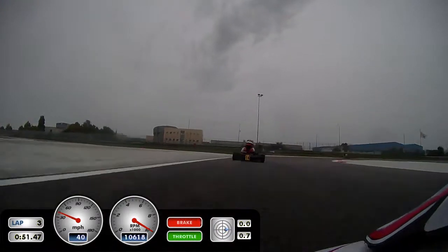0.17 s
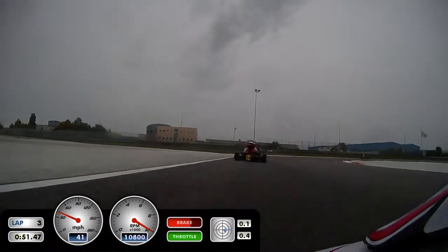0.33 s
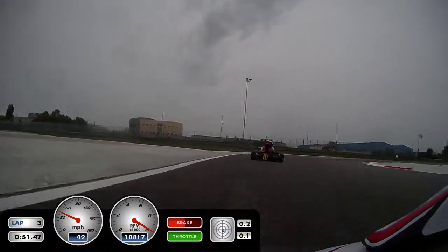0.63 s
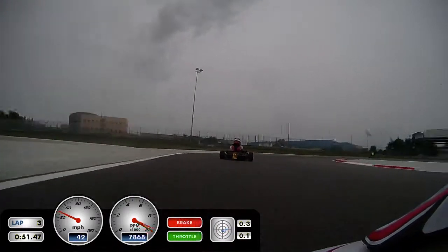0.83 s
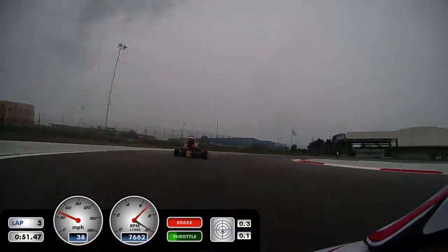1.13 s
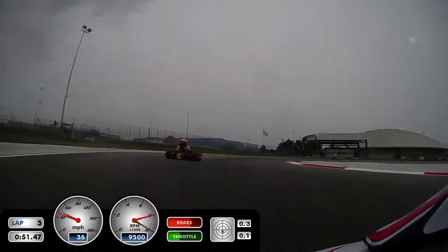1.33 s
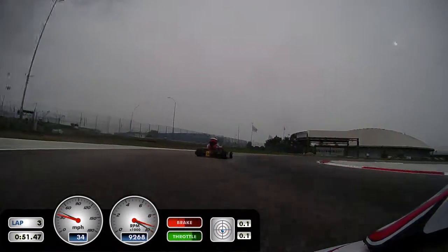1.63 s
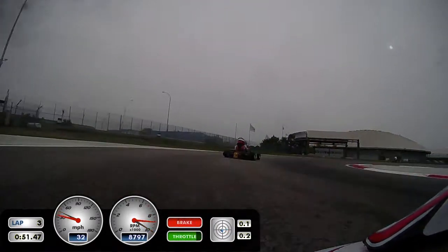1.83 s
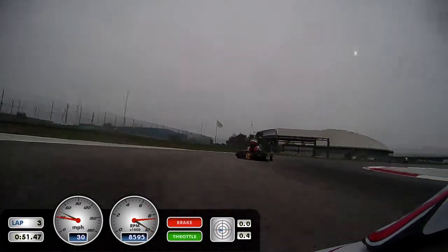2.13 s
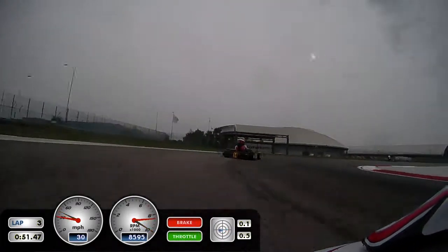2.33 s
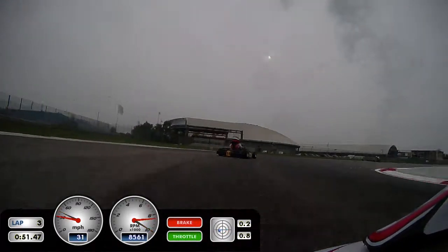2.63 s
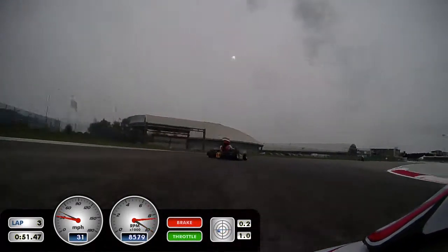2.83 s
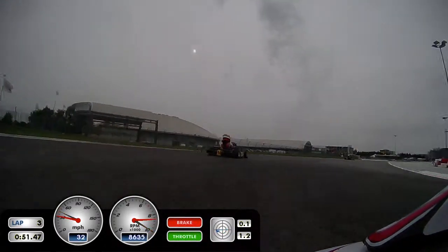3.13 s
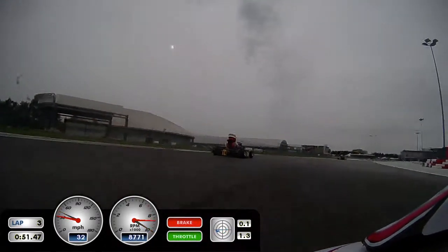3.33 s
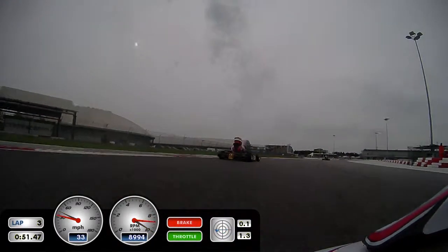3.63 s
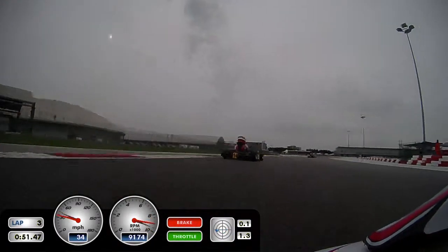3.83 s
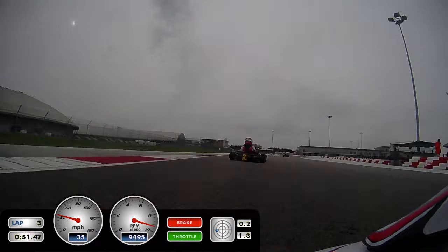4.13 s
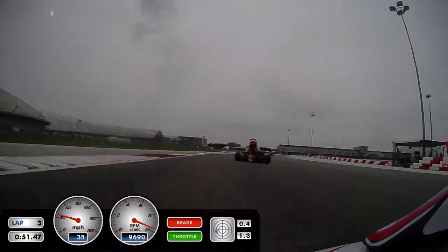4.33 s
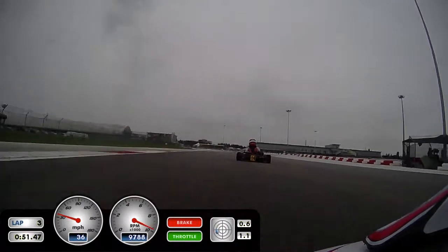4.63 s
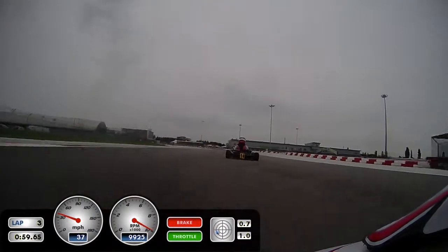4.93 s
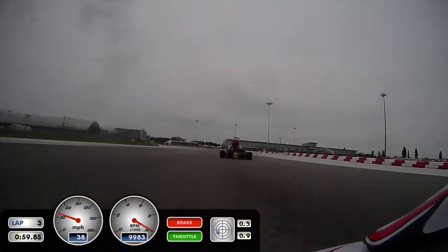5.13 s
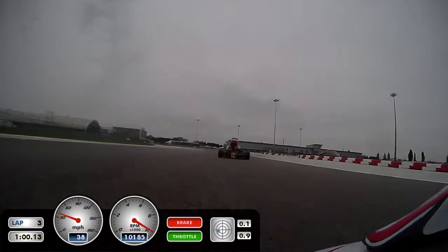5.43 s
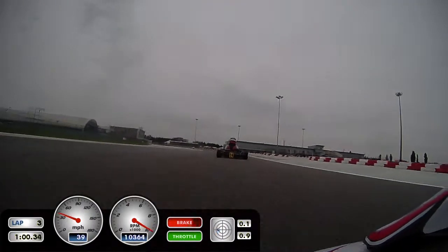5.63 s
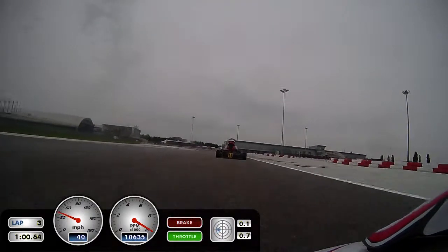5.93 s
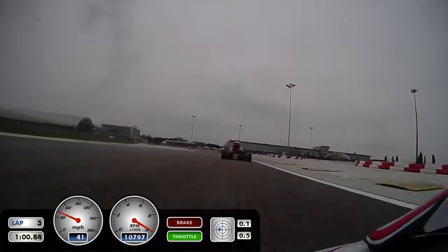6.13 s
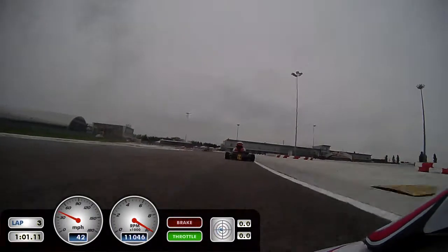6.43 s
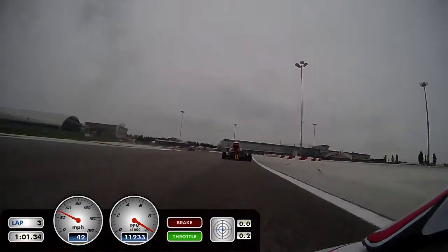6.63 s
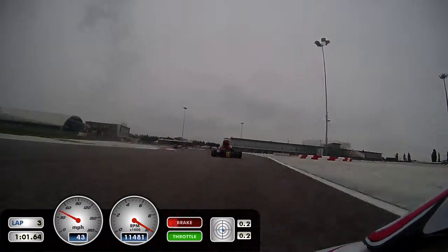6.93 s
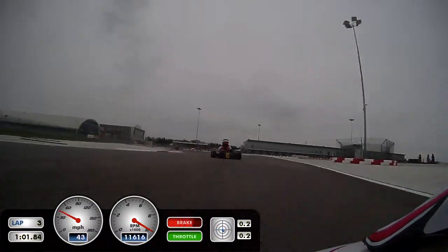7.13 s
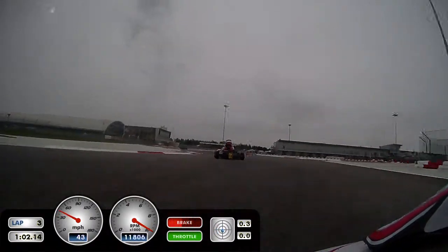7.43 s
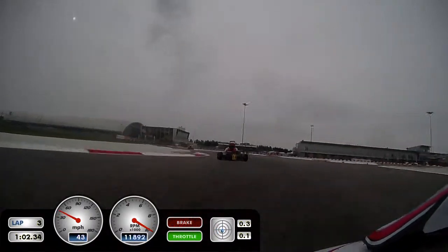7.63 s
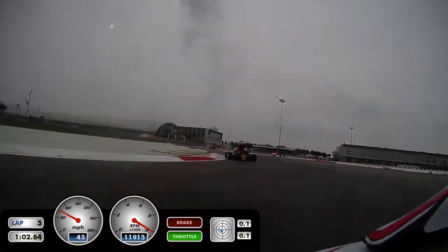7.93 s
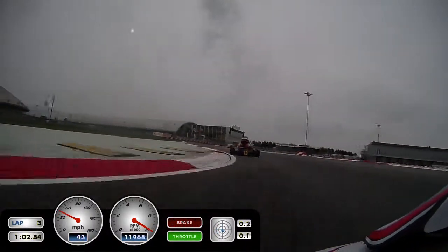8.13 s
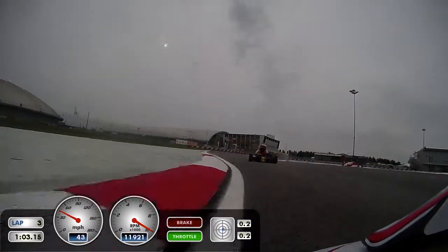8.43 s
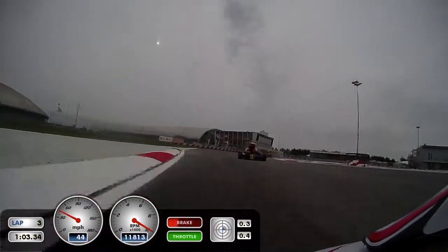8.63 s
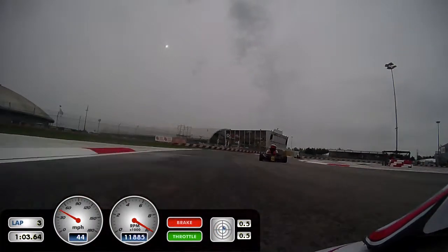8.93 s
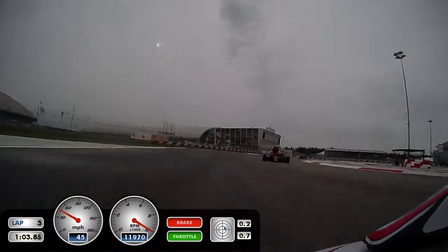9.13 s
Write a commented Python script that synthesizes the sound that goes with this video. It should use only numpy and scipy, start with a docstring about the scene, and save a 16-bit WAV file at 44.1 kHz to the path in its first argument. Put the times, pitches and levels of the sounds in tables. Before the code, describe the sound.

A two-stroke racing kart is heard from a microphone on its own frame, loud, dry and heavily overloaded. The engine starts on a high, hard drone, rising slightly until 0.5 s, then its revs plunge to a low, sputtering growl around 0.85 s, with a short unsteady tyre chirp and bumps. By 1.1 s it has leapt back up; it sags a little and holds a steady, rough buzz from about 2 to 3 s while the wind eases. From there the pitch climbs gradually, exhaust overtones singing through from about 3.6 to 5.5 s. A nasal metallic whine from the housing and a bright mount rattle follow the engine, growing coarser after 6.5 s. Wind blasts thump around 5.2, 5.5 and 6.9 to 7.6 s. Kerb hits chatter at about 8.3 to 8.4 s; the revs dip slightly, then rise again, still screaming at the end.

```python
"""Racing kart, heard from its own frame

A two-stroke racing kart heard from a camera on its frame: it brakes for a corner, then pulls up to full speed.
Engine boom and the tones of exhaust and bodywork are sine waves tied to the crank; each firing also rings the
housing and mount. Shaped noise makes the wind, the tyre roar and the kerb hits; an unsteady sine makes the tyre
chirp. It all overloads the microphone: the boom is squared off and chops everything else in its own rhythm."""
import sys
import numpy as np
from scipy import signal
from scipy.fft import rfft, irfft
from scipy.io import wavfile
from scipy.ndimage import uniform_filter1d

SR = 44100
rng = np.random.default_rng(int(sys.argv[2]) if len(sys.argv) > 2 else 0)


def master(y):
    """Save y as 16-bit WAV."""
    cut = np.clip(np.atleast_2d(y).T, -1, 1)
    pcm = np.round(cut * 32767)  # scale
    wavfile.write(sys.argv[1], SR, pcm.astype(np.int16))


N = 409248
TIME = np.arange(N) / SR

# Crank speed; the engine fires once a turn: start_s, turns_per_second_hz
CRANK_SPEED = [(0, 177.8), (.48, 182.8), (.58, 164.5), (.7, 126.7), (.78, 91.4), (.85, 76.1), (1, 136.1),
               (1.13, 156.4), (1.4, 160), (1.6, 148), (1.9, 142.7), (2.65, 142), (3.1, 145.9),
               (3.63, 151.5), (3.74, 155), (4.12, 161.3), (4.42, 162.7), (5.2, 167.9), (5.77, 177.2),
               (6.43, 185.7), (7.2, 196.6), (8.05, 199.6), (8.62, 195.5), (9.28, 203.1)]
# How unevenly the firings shake the frame: start_s, roughness (0 to 1)
ROUGHNESS = [(0, .42), (.5, .26), (.7, .6), (1.7, .4), (3.2, .32), (4.2, .16), (5.2, .17), (6.25, .26),
             (6.55, .64), (9.28, .7)]


def crank(flutter=.016, flutter_hz=20):
    """Counts the turns of the crank by adding up its speed, which flutters more when the ride is rough."""
    speed_hz, = curves(CRANK_SPEED)
    rough, = curves(ROUGHNESS)
    fluttering_hz = speed_hz * (1 + flutter * rough * wander(flutter_hz))
    return np.cumsum(fluttering_hz) / SR


# Strength of the boom's two tones at each crank speed, before the overall level:
# crank_speed_hz, first_order_db, second_order_db
PIPE_STRENGTH = [(78, -8, -13.5), (132, -8.5, -19.5), (143.3, -0.73, -21.5), (161.6, -0.85, -20.5),
                 (164.5, 1, -30), (185.1, -1.5, -16), (190.7, -6.5, -10), (200.5, -8, -10.5)]


def boom(turns, uneven=0.055, uneven_hz=50, second_lag=0.086, level_db=-0.98):
    """Intake and exhaust pressure: one wave per turn (first order) and one twice as fast (second order)."""
    first_db, second_db = by_speed(PIPE_STRENGTH)
    angle = 2 * np.pi * turns
    first = from_db(first_db) * np.sin(angle)
    second = from_db(second_db) * np.sin(2 * (angle - 2 * np.pi * second_lag))  # lag in turns
    return from_db(level_db) * (first + second) * (1 + uneven * wander(uneven_hz))


# Engine orders that sing out as the revs pass resonances of the exhaust pipe and the bodywork: # start_s,
# end_s, order (waves per turn), peak_db (before the waver)
ORDER_TONES = [(1.5, 5.4, 4, -32.5), (1.85, 2.697, 7, -31), (3.613, 5.501, 5, -27.5),
               (3.618, 5.4, 7, -37), (3.624, 4.65, 10, -22.5), (5.86, 6.85, 4, -31),
               (6.26, 6.949, 5, -24.5), (6.696, 8.595, 3, -28), (6.9, 9.4, 8, -26),
               (8.747, 9.4, 5, -27.5)]


def drones(turns, fade_s=0.1, waver=0.25, waver_hz=14):
    """Clean upper engine orders from exhaust and bodywork: sine waves at whole multiples of the crank speed."""
    tones = 0
    for start, end, order, peak_db in ORDER_TONES:
        tone = np.sin(2 * np.pi * round(order) * turns)
        tones = tones + from_db(peak_db) * gate(start, end, fade_s) * tone
    return tones * (1 + waver * wander(waver_hz))


def shaking(turns, rough, uneven_db=3, burst_s=0.0049, between=0.74, settle=0.72):
    """Each firing knocks the frame and starts a dying burst of noise; at low revs it is calmer in between."""
    speed_hz, = curves(CRANK_SPEED)
    firing = np.floor(turns - turns[0] // 1).astype(int)  # number of the current firing
    strength = from_db(uneven_db * rng.standard_normal(N))[firing]
    knocks = strength * (np.diff(firing, prepend=0) > 0)  # one click where the number goes up
    since_firing_s = (turns % 1) / speed_hz
    unrest = between * (speed_hz / speed_hz.max()) ** settle
    chatter = (unrest + strength * np.exp(-since_firing_s / burst_s)) * rng.standard_normal(N)
    rough = np.clip(rough, 0, 1)
    return (1 - rough) * unit(knocks) + rough * unit(chatter)


# Resonances of the camera housing: pitch_hz, width_hz, relative_level_db
HOUSING_MODES = [(790, 180, -10), (990, 80, -13), (1500, 30, -14), (1633, 230, 2.5), (1800.6, 70, 15.5),
                 (1910, 170, -10)]
# How hard the frame shakes, before the level settings of housing and mount:
# crank_speed_hz, housing_ring_db, mount_rattle_db
FRAME_SHAKE = [(78, -35, -37.5), (127, -28, -35.5), (142, -21.5, -32.5), (160, -19, -31),
               (167.3, -17, -30.5), (177.6, -17.5, -26), (188.7, -16.5, -20.5), (197.6, -19, -22)]


def housing(turns, lag=0.048, ring_db=-3, buzz_db=-5, flicker_db=2.4, flicker_hz=32):
    """The housing sings near one pitch as engine orders sweep through it, and sputters on rough going."""
    sing_db, _ = by_speed(FRAME_SHAKE)
    rough, = curves(ROUGHNESS)
    late_turns = turns - lag
    ringing = steady(ring(shaking(late_turns, rough), HOUSING_MODES))
    sing = from_db(ring_db) * ringing + from_db(buzz_db) * buzz(late_turns)
    sputter_db = flicker_db * rough * wander(flicker_hz)
    return sing * from_db(sing_db + jolts() + sputter_db)


# A loose part of the housing locks to one engine order, then jumps to another:
# start_s, end_s, order (swings per turn)
BUZZ_ORDERS = [(-.1, .53, 10), (1.08, 1.48, 11), (1.52, 1.95, 12), (2.68, 3.66, 12), (3.68, 5.1, 11),
               (5.47, 6.3, 10), (6.4, 9.4, 9)]


def buzz(turns, slip=1.4, slip_hz=30, grip_s=0.031):
    """The locked part swings as a cosine on one order, its timing slipping on rough going."""
    rough, = curves(ROUGHNESS)
    slipping = slip * rough * wander(slip_hz)  # slip in radians
    swings = 0
    for start, end, order in BUZZ_ORDERS:
        swings = swings + gate(start, end, grip_s) * np.cos(2 * np.pi * order * turns + slipping)
    return swings


# Bumps and coarse asphalt that make housing and mount ring harder:
# centre_s, spread_s (centre to 1/e), added_db (in full for the housing, a share for the mount)
ROAD_JOLTS = [(0.82, .009, 8), (0.981, .008, 7.5), (1.185, 0.015, 2.5), (2.162, .004, 9),
              (3.552, 0.16, 2.5), (4.185, 0.12, 5), (5.835, 0.078, 4.5), (6.896, .006, 4),
              (7.09, .004, 6.5), (7.259, 0.0061, 11), (8.287, .08, 5), (8.549, .005, 7)]


def jolts():
    """Bumps in the asphalt shake the frame harder: bell-shaped rises in decibels."""
    return sum(added_db * bump(centre, spread) for centre, spread, added_db in ROAD_JOLTS)


# Resonances of the rattling mount: pitch_hz, width_hz, relative_level_db
MOUNT_MODES = [(3620, 67, 11), (4006, 180, 10.5), (4910, 190, 7), (5540, 700, -28), (6500, 510, -25.5)]


def mount(turns, lag=0.032, level_db=-3.0, rough=1.0, flicker_db=1.5, flicker_hz=35, jolt_share=0.24):
    """The shaken mount rattles high and bright; its level flickers more at low revs."""
    _, rattle_db = by_speed(FRAME_SHAKE)
    speed_hz, = curves(CRANK_SPEED)
    shakes = shaking(turns - lag, rough, uneven_db=0.0, burst_s=0.0064, between=0.52)
    highpass = signal.butter(4, 3300, "high", fs=SR)
    rattle = signal.lfilter(*highpass, ring(shakes, MOUNT_MODES))
    clatter_db = flicker_db * speed_hz.max() / speed_hz * wander(flicker_hz)
    return steady(rattle) * from_db(level_db + rattle_db + clatter_db + jolt_share * jolts())


# A wheel strikes the kerb and the whole camera chatters: centre_s, spread_s (centre to 1/e), level_db
KERB_HITS = [(8.268, .006, -10), (8.384, .011, -6)]


def kerb(rattle_share=0.11):
    """Short bursts of hard shaking: noise rings through housing and mount together."""
    shocks = rng.standard_normal(N)
    chatter = unit(ring(shocks, HOUSING_MODES)) + rattle_share * unit(ring(shocks, MOUNT_MODES))
    loudness = sum(from_db(level_db) * bump(centre, spread) for centre, spread, level_db in KERB_HITS)
    return steady(chatter, size=600) * loudness


# The braked rear tyres chirp as they nearly lock: time_s, pitch_hz (before scatter), level_db
TYRE_CHIRP = [(.77, 945, -57), (.795, 940, -28), (0.816, 924, -35), (.83, 903, -29), (.85, 823, -29),
              (.87, 820, -63)]


def chirp(scatter=0.065, scatter_hz=120):
    """Rubber sticks and slips, heard as a sine wave of unsteady pitch."""
    pitch_hz, level_db = curves(TYRE_CHIRP)
    unsteady_hz = pitch_hz * (1 + scatter * wander(scatter_hz))
    squeal = np.sqrt(2) * np.sin(2 * np.pi * np.cumsum(unsteady_hz) / SR)
    return gate(TYRE_CHIRP[0][0], TYRE_CHIRP[-1][0], .005) * from_db(level_db) * squeal


# Wind on the microphone, before the overall level: time_s, level_db
WIND_LEVEL = [(0, -9.5), (.6, -7), (.9, -8), (1.35, -5), (1.9, -11.5), (2.3, -20), (3.3, -16.5),
              (4.0, -16.5), (4.6, -10), (5.6, -13.5), (6.5, -11.5), (7.6, -5.5), (8.6, -8.5), (9.28, -7)]
# Colour of the wind noise: pitch_hz, relative_level_db (per Hz)
WIND_SPECTRUM = [(10, -7), (35, 4), (55, -1), (80, -1), (160, -10), (300, -18.5), (500, -24.5),
                 (800, -29.5), (1200, -42.5), (2500, -53.5), (7000, -59)]
# Single blasts of air, a push and then a pull: centre_s, length_s, peak_db
WIND_GUSTS = [(.707, .02, -5), (0.863, 0.016, -4), (1.344, .025, -2.5), (1.372, 0.02, -3.5),
              (4.559, 0.037, -5.5), (5.157, 0.025, 1.5), (5.537, 0.02, -0.5), (6.889, 0.018, 4),
              (7.071, .024, 1), (7.131, 0.012, 3), (7.297, 0.015, 2), (7.642, 0.0083, 0.5),
              (8.138, .018, 0.5), (8.28, 0.018, 7), (8.904, 0.017, -1.5)]


def wind(level_db=-2.5, lumpy_db=2.0, lumpy_hz=14):
    """Air tumbling over the microphone: noise of lumpy level, plus blasts of one sine cycle each."""
    wind_db, = curves(WIND_LEVEL)
    air = from_db(level_db + wind_db + lumpy_db * wander(lumpy_hz)) * coloured(WIND_SPECTRUM)
    for centre, length, peak_db in WIND_GUSTS:
        cycle = np.clip((TIME - centre) / length, -.5, .5)  # silent at both ends and beyond
        air -= from_db(peak_db) * np.sin(2 * np.pi * cycle)
    return air


# Colour of tyres on asphalt, carried through the frame: pitch_hz, relative_level_db (per Hz)
ROAD_SPECTRUM = [(20, -14), (100, 3.5), (200, 1.5), (330, -2.5), (550, -10.5), (800, -15.5), (1300, -20),
                 (2500, -25.5), (7000, -37)]


def road(level_db=-18, octave_db=7, lumpy_db=2, lumpy_hz=18):
    """Tyre roar of lumpy level; the axle is chained to the crank, so the noise grows with the revs."""
    speed_hz, = curves(CRANK_SPEED)
    speed_db = octave_db * np.log2(speed_hz / speed_hz.mean())  # octave_db for each doubling of speed
    return from_db(level_db + speed_db + lumpy_db * wander(lumpy_hz)) * coloured(ROAD_SPECTRUM)


def ring(x, modes):
    """Passes x through resonances side by side; neighbours in the list move in opposite senses."""
    ringing = 0
    for k, (pitch_hz, width_hz, level_db) in enumerate(modes):
        resonance = signal.iirpeak(pitch_hz, pitch_hz / width_hz, SR)
        ringing = ringing + (-1) ** k * from_db(level_db) * signal.lfilter(*resonance, x)
    return ringing


def from_db(db):
    """Turns decibels into a multiplier."""
    return 10 ** (np.asarray(db) / 20)


def unit(x):
    """Scales x to an average (rms) level of 1."""
    return x / np.sqrt(np.mean(x ** 2) + 1e-20)


def steady(x, size=6000):
    """Evens out x so its rms level over a sliding window of size samples stays near 1."""
    return x / np.sqrt(abs(uniform_filter1d(x ** 2, size)) + 1e-12)


def curves(rows):
    """Turns each column of a table into a curve over time."""
    s, *columns = np.transpose(rows)
    return [np.interp(TIME, s, column) for column in columns]


def by_speed(rows):
    """Looks up each column of a crank-speed table, giving curves over time."""
    speed_hz, = curves(CRANK_SPEED)
    speeds, *columns = np.transpose(sorted(rows))
    return [np.interp(speed_hz, speeds, column) for column in columns]


def wander(hz):
    """Random drift of rms 1, mostly slower than hz."""
    f = np.fft.rfftfreq(N, 1 / SR)
    slow = rfft(rng.standard_normal(N)) / (1 + (f / hz) ** 4)
    return unit(irfft(slow, N))


def shaped(x, points):
    """Filters x so each pitch gets the level given in points."""
    hz, db = np.transpose(points)
    f = np.fft.rfftfreq(2 * N, 1 / SR)
    gain = from_db(np.interp(np.log(f + 1), np.log(hz), db))
    return irfft(rfft(x, 2 * N) * gain)[..., :N]


def coloured(points):
    """Noise of rms 1 with the given spectrum."""
    return unit(shaped(rng.standard_normal(N), points))


def gate(start, end, fade_s):
    """One between start and end, with sloping edges, and zero outside."""
    return np.clip(np.minimum(TIME - start, end - TIME) / fade_s, 0, 1)


def bump(centre, spread):
    """A bell-shaped rise to 1 and back."""
    return np.exp(-((TIME - centre) / spread) ** 2)


def scene():
    """Adds up all the pressure at the microphone."""
    turns = crank()
    engine = boom(turns) + drones(turns) + housing(turns) + mount(turns)
    return (engine + kerb() + chirp() + wind() + road())[None]


# Tone of the recorder after its input stage: pitch_hz, level_db (before the final gain)
RECORDER_TONE = [(100, 0.5), (700, -1.5), (1450, -0.86), (2100, -1.5), (2900, -3), (4000, -3.5), (5000, -2),
                 (6000, -2.5), (7000, -7)]


def record(dry, rail=.5, coupling_hz=21.0, gain_db=0.13, edge_hz=7150):
    """The input clips hard at the rail, a capacitor makes the flat tops droop, and the treble ends at edge_hz."""
    fine = signal.resample_poly(dry, 2, 1, axis=1)  # clip at twice the sample rate
    clipped = signal.resample_poly(np.clip(fine, -rail, rail), 1, 2, axis=1)
    drooped = signal.lfilter(*signal.butter(1, coupling_hz, "high", fs=SR), clipped)
    toned = from_db(gain_db) * shaped(drooped, RECORDER_TONE)
    lowpass = signal.firwin(121, edge_hz, window=("kaiser", 8), fs=SR)
    return signal.oaconvolve(toned, lowpass[None], "same")


dry = scene()
out = record(dry)
master(out)
```